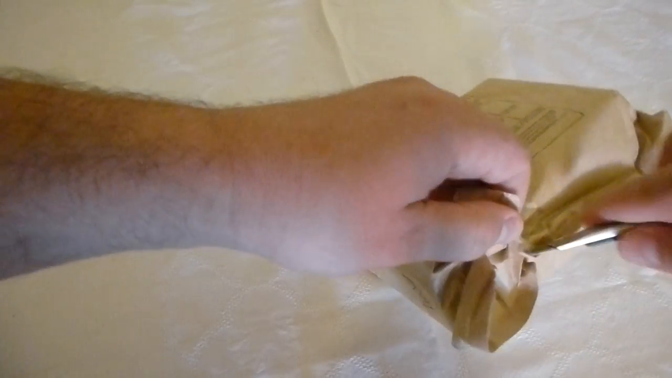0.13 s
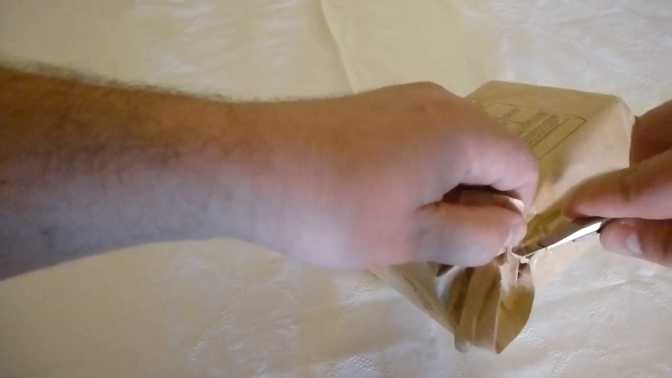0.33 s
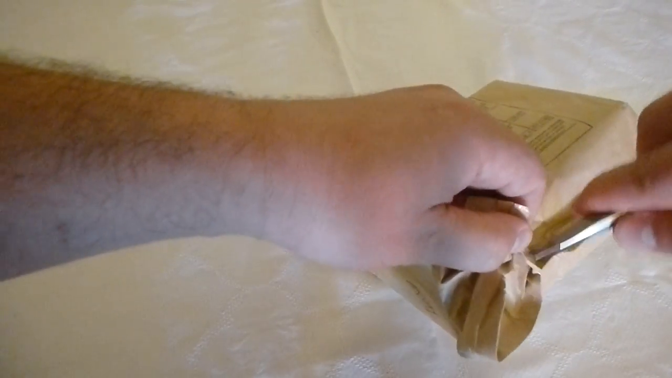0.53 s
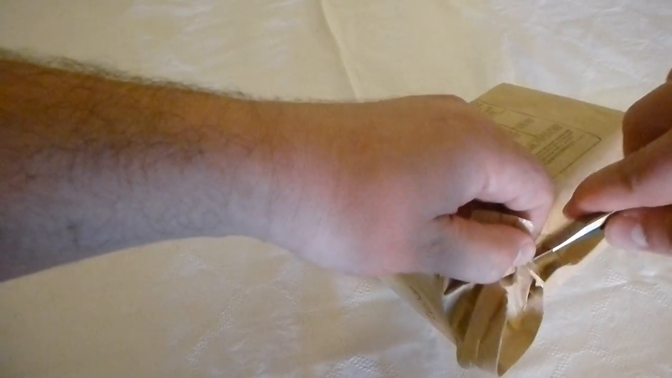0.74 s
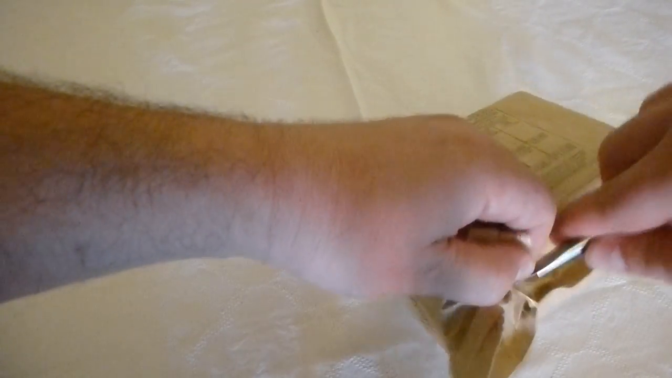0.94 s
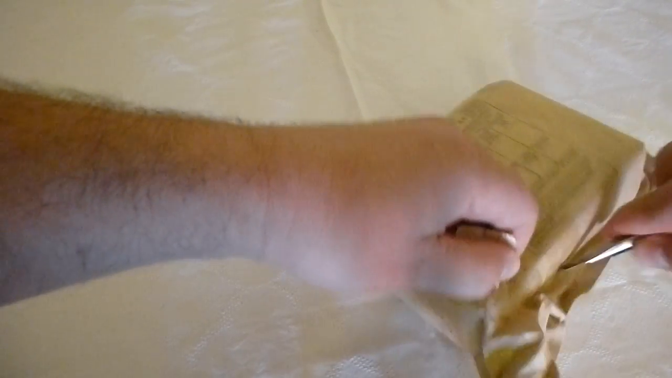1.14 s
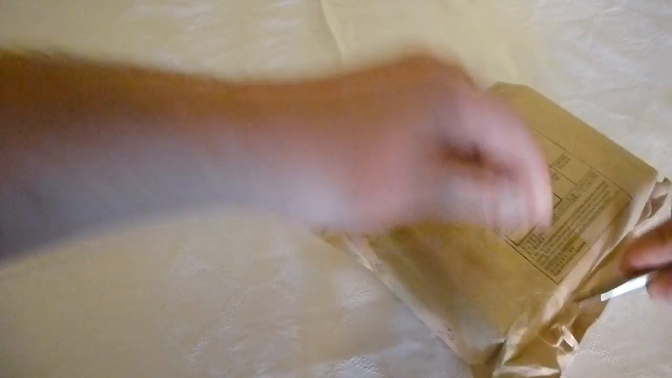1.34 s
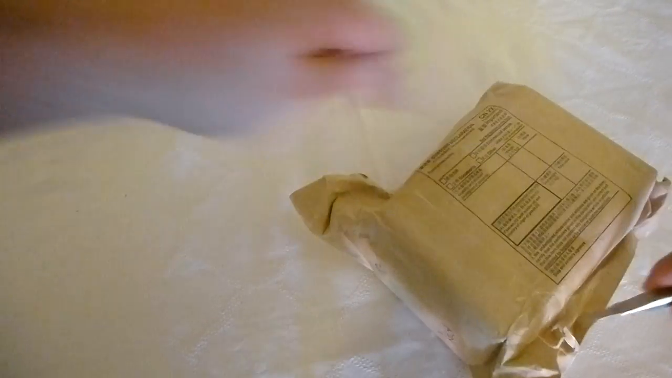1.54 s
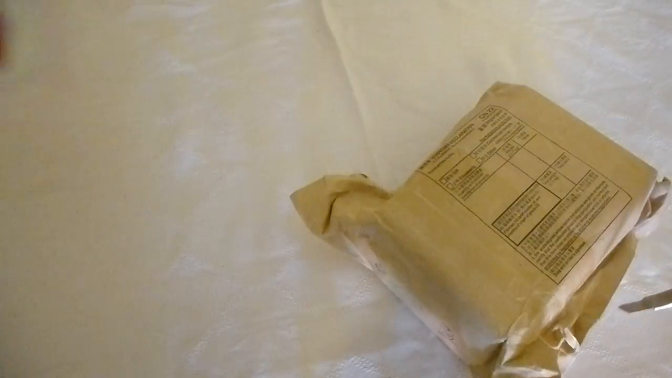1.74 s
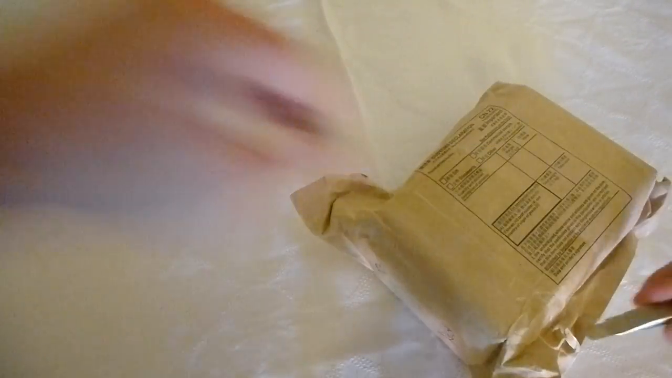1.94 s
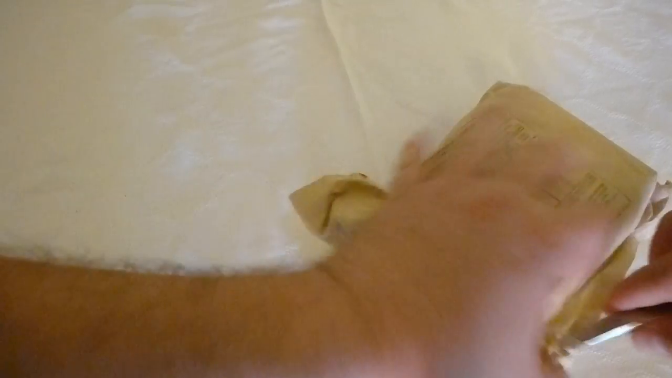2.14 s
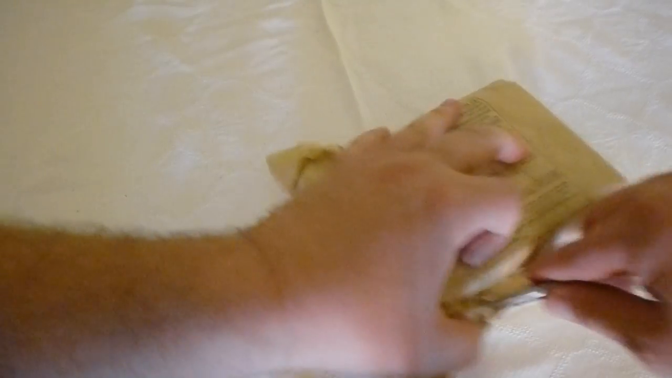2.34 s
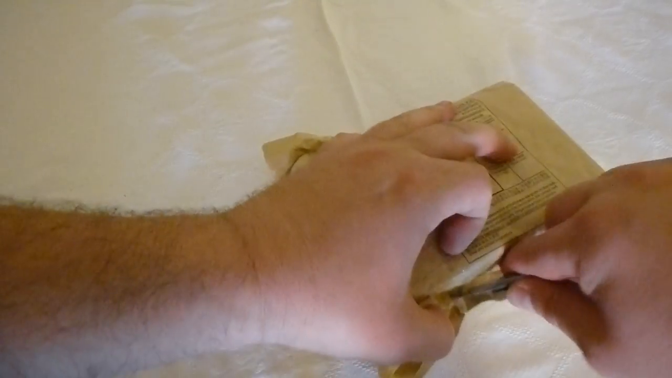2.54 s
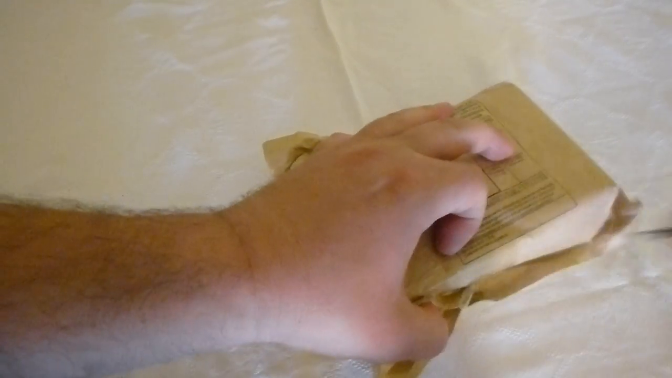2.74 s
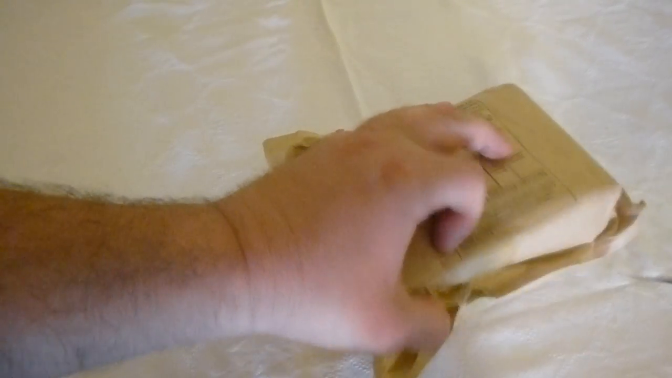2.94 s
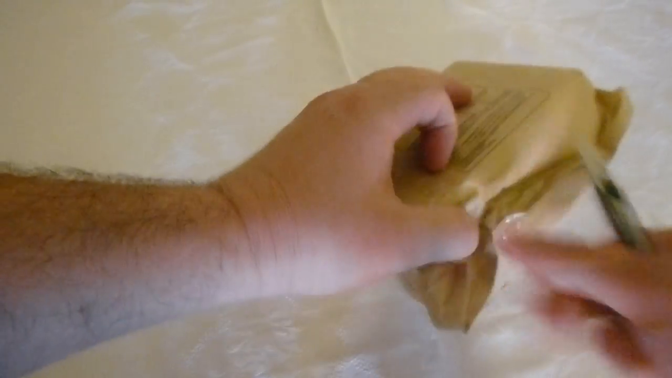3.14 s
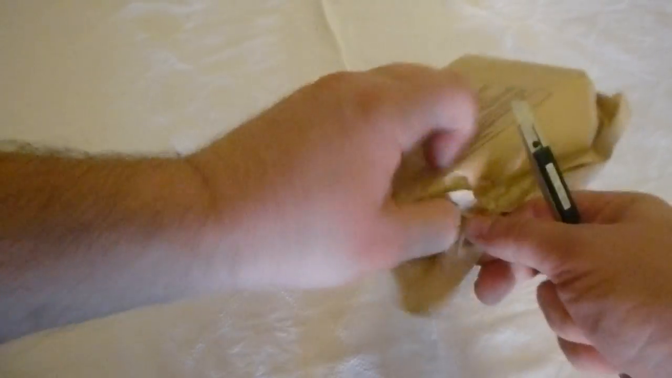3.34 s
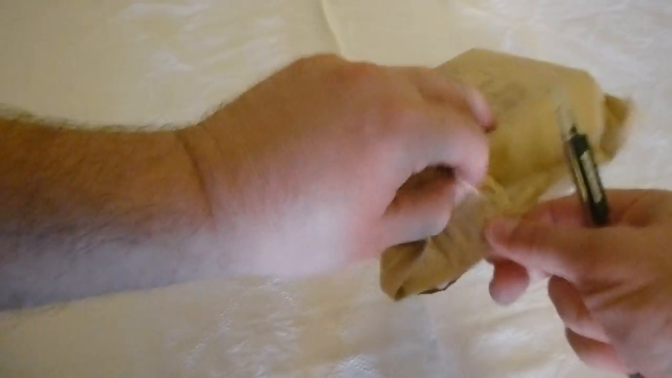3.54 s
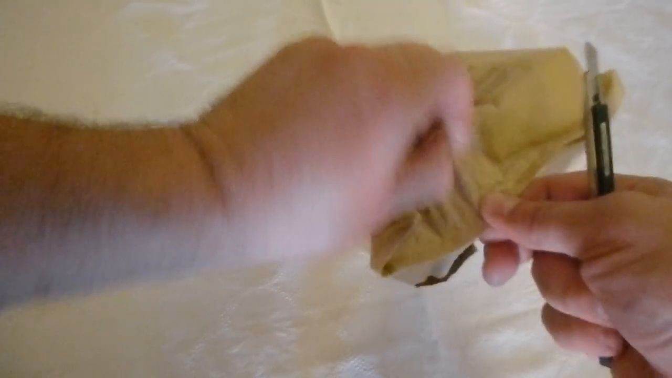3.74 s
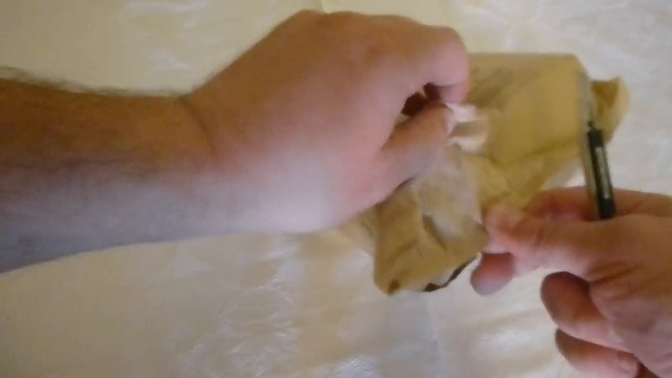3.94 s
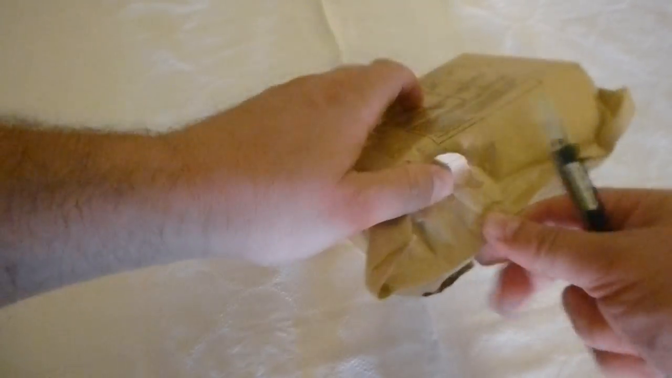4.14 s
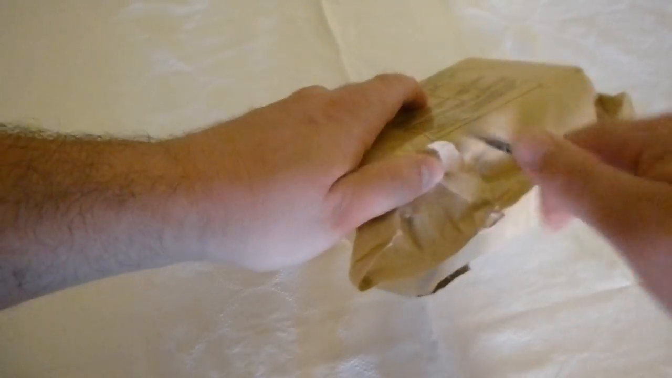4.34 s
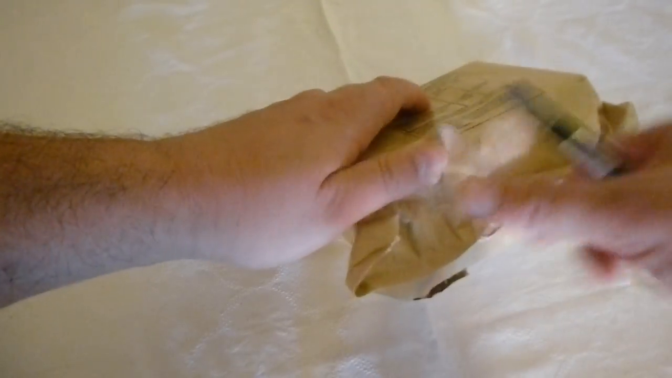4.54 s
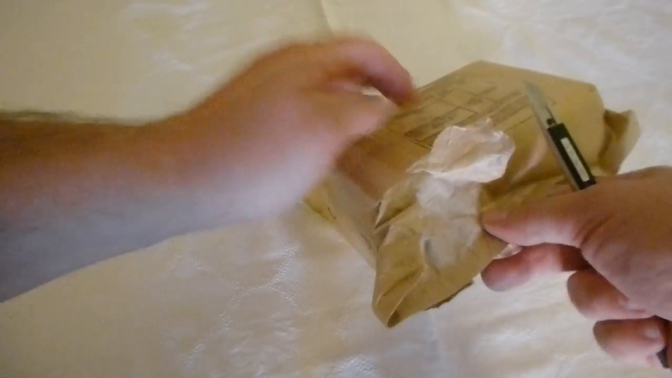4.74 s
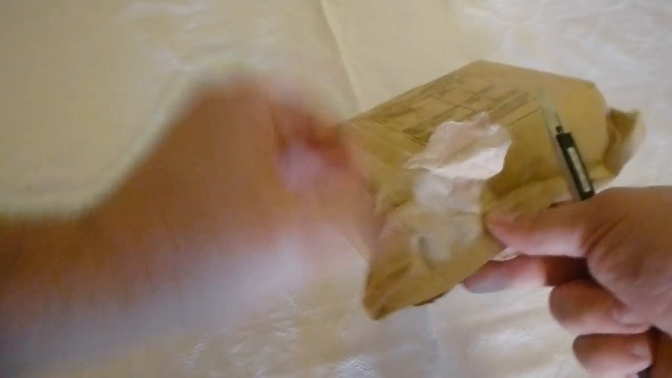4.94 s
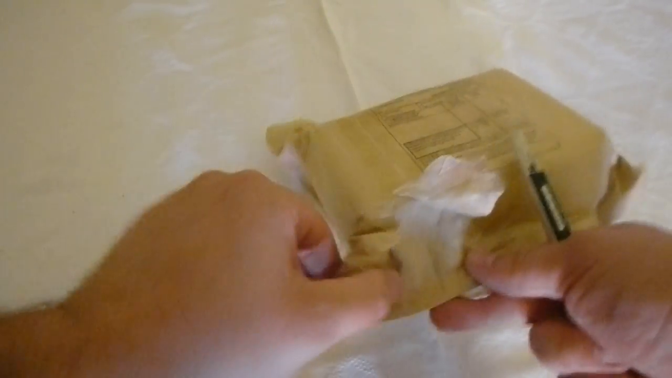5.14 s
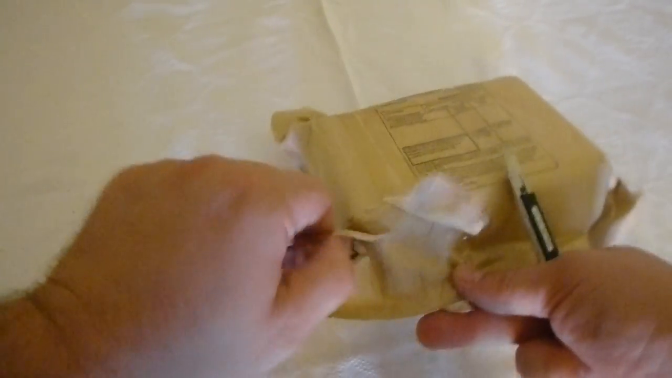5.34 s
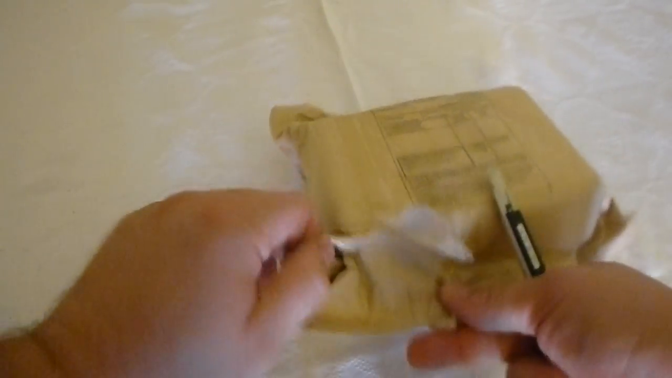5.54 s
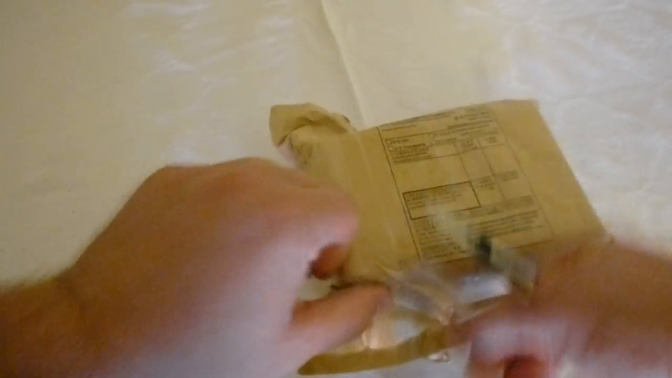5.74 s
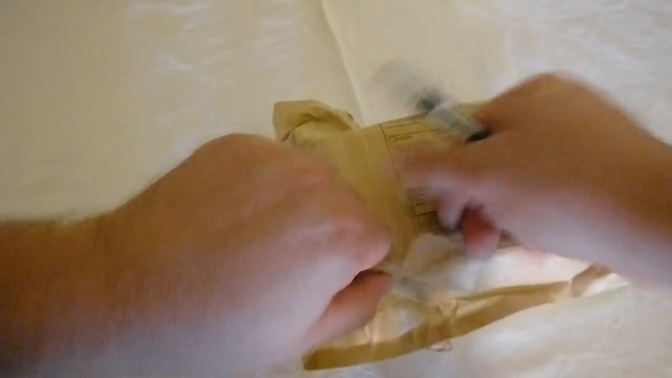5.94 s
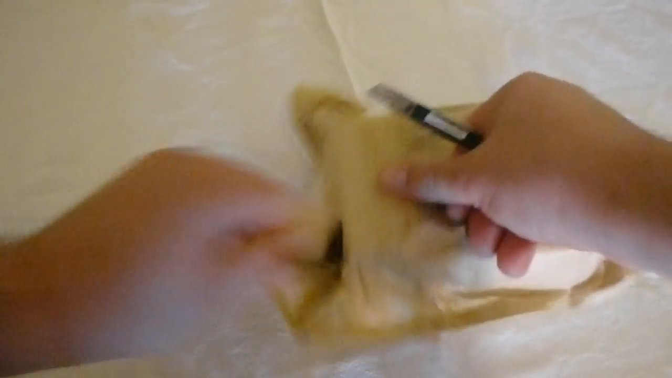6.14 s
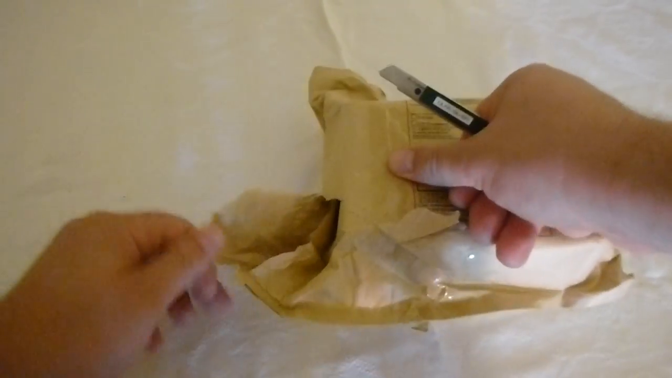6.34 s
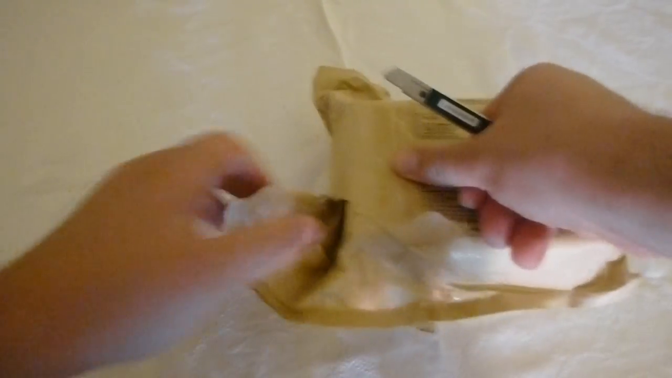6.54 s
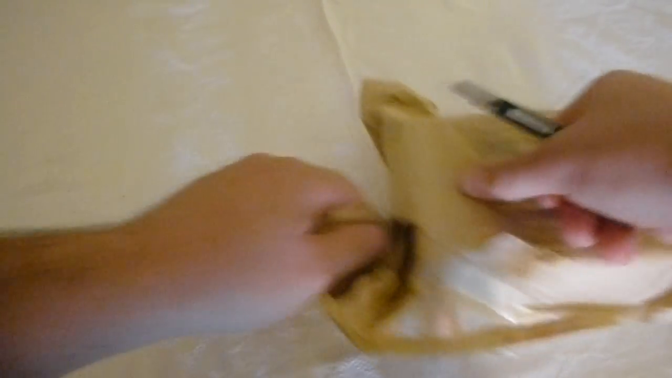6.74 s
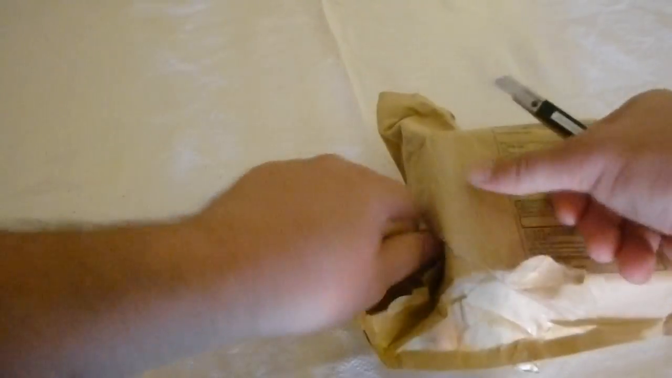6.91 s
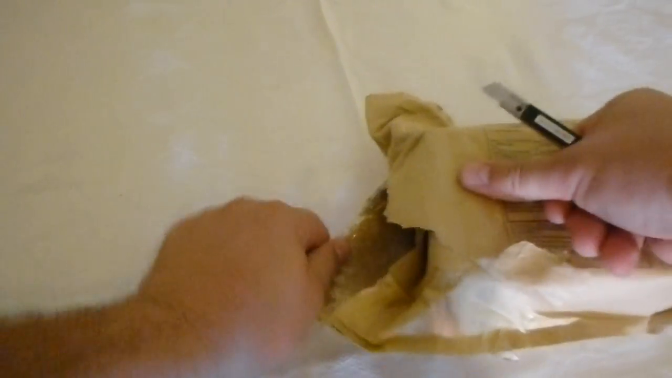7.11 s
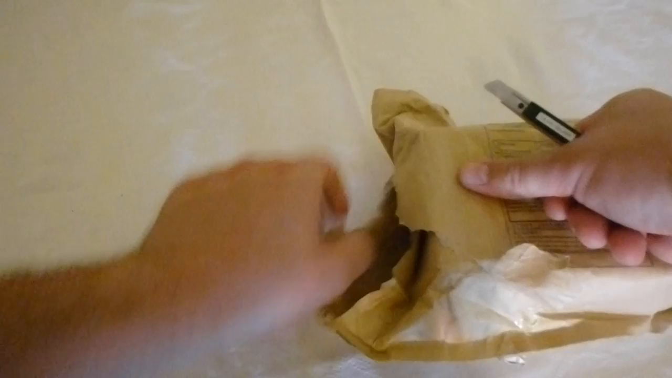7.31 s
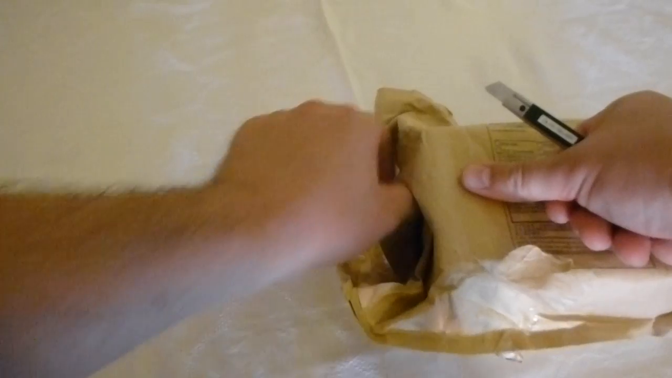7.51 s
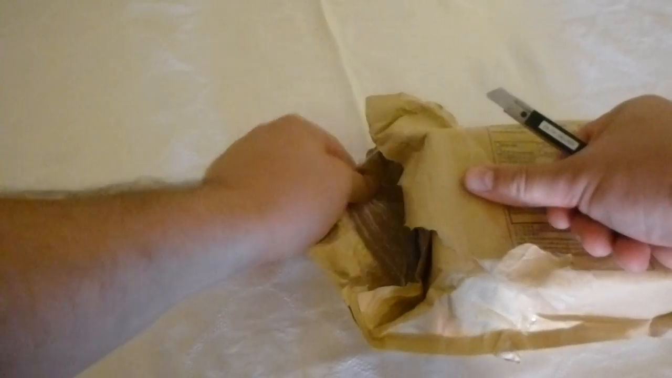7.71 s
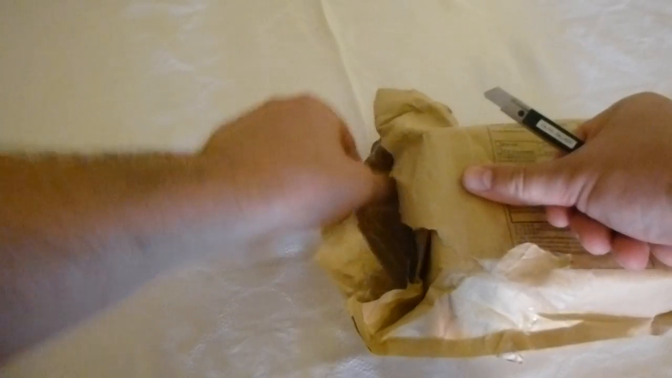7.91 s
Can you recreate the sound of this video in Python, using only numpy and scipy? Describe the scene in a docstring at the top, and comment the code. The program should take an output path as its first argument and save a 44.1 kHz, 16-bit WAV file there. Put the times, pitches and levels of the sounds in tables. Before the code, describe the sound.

Close up, hands pick at and rip open a crinkly paper parcel in short pulls, with sharp crease snaps and plastic ticks in a small room.

```python
"""Parcel ripped open by hand

Hands pick at a brown paper parcel on a cloth-covered surface and rip it open in short pulls, heard from close by.
Tears, rubs and pinches are showers of tiny fractures, each ringing a scrap of paper; scrapes are noise in one band.
Snapping creases and ticks of tape and a plastic pouch are noise bursts through resonances; bumps are low
decaying tones and thuds. Dense echoes of a small room answer, over steady noise."""
import sys
import numpy as np
from scipy import signal
from scipy.io import wavfile
from scipy.ndimage import map_coordinates

SR = 44100
rng = np.random.default_rng(int(sys.argv[2]) if len(sys.argv) > 2 else 0)


def file_out(sig):
    """Save sig as 16-bit WAV at sys.argv[1]."""
    # one column per channel
    cols = np.atleast_2d(sig).T
    # limit, then scale
    lim = np.clip(cols, -1, 1)
    pcm = np.round(lim * 32767).astype(np.int16)
    wavfile.write(sys.argv[1], SR, pcm)


N = 355887
TIME = np.arange(N) / SR


def amp(db):
    """Decibels to gain."""
    return 10 ** (np.asarray(db) / 20)


def unit(x):
    """Scales to rms 1."""
    return x / np.sqrt(np.mean(x ** 2) + 1e-20)


def read(points, hz):
    """Reads a curve on a log-frequency axis."""
    f, value = np.transpose(points)
    return np.interp(np.log(hz + 1), np.log(f + 1), value)


def add(mix, s, sound):
    """Mixes a sound in at time s."""
    part = mix[max(round(s * SR), 0):][:len(sound)]
    part += sound[:len(part)]


def colour(x, points, size=2048):
    """Causal minimum-phase filter with the given spectrum."""
    bins_hz = abs(np.fft.fftfreq(size, 1 / SR))
    log_gain = np.log(amp(np.maximum(read(points, bins_hz), -100)))
    taps = np.fft.ifft(np.exp(np.conj(signal.hilbert(log_gain)))).real
    return signal.oaconvolve(x, taps)[:len(x)]


def lowpass(x, hz):
    """Keeps what lies under hz."""
    return signal.sosfilt(signal.butter(2, min(hz, SR / 2 - 10), fs=SR, output="sos"), x)


def ring(x, hz, width_hz):
    """One resonance of gain 1."""
    hz = min(hz, 0.45 * SR)
    return signal.lfilter(*signal.iirpeak(hz, hz / min(width_hz, SR / 4), SR), x)


def moving_ring(x, hz, width_hz):
    """A resonance of gain 1 that follows the pitch curve hz."""
    turn = np.exp(2j * np.pi * np.cumsum(hz) / SR)
    r = np.exp(-np.pi * width_hz / SR)
    # shift the band down to 0 Hz, smooth, shift back
    return 2 * (turn * signal.lfilter([1 - r], [1, -r], x / turn)).real


def wander(knots_per_s):
    """Smooth random curve of rms 1 through knots_per_s random values a second."""
    knots = rng.standard_normal(N // 16)
    return unit(map_coordinates(knots, [TIME * knots_per_s], order=2, mode="wrap"))


def crackle(per_s, spread_db, clump_db, clump_rate, sharpness, steady_s, top_hz=15000, count=18):
    """Clumps of tiny fractures; each briefly rings a scrap of paper of its own pitch."""
    clumps = amp(clump_db * wander(clump_rate))
    sizes = amp(spread_db * np.minimum(rng.exponential(1, N), 3.5)) * rng.choice([-1, 1], N)
    clicks = sizes * clumps * (rng.random(N) < per_s / SR)
    scrap = rng.integers(0, count, N)
    out = 0.36 * lowpass(clicks, top_hz)
    for k, hz in enumerate(np.geomspace(700, top_hz, count)):
        out += ring(ring(clicks * (scrap == k), hz, hz / sharpness), hz, 2 * hz)
    # even out the power over steady_s: the hand, not the fracture sizes, sets the level
    power = signal.oaconvolve(out ** 2, signal.windows.hann(int(steady_s * SR)), "same")
    return unit(out / np.sqrt(abs(power) + 1e-3 * power.mean()))


def effort(moves, attack_s, attack_share, release_s, swell_db_per_s, dulling_db_per_s, size=2000):
    """Level and brightness curves/dB of hand movements, each an attack, a hold and a release."""
    t = np.linspace(0, N / SR, size)
    mids = treble = 1e-10
    for start, length, level_db, bright_db in moves:
        before = np.maximum(start - t, 0) / (attack_s + attack_share * length)
        after = np.maximum(t - start - length, 0) / release_s
        from_middle = np.clip(t - start, 0, length) - length / 2
        power = (amp(level_db + swell_db_per_s * from_middle) * np.exp(-before - after)) ** 2
        ratio = amp(bright_db - dulling_db_per_s * from_middle) ** 2
        mids = mids + power / (1 + ratio)
        treble = treble + power * ratio / (1 + ratio)
    return [np.interp(TIME, t, 10 * np.log10(p)) for p in (mids + treble, treble / mids)]


# hollow under the lifted paper: f/Hz, width/Hz, level/dB
HOLLOW_MODE = (3580, 690, -6.5)


def wrapping(x, move_rate, squeeze=0.17):
    """The hollow of the parcel rings; its pitch wanders as under squeezing."""
    hz, width_hz, db = HOLLOW_MODE
    return x + amp(db) * moving_ring(x, hz * np.exp(squeeze * wander(move_rate)), width_hz)


def play(x, level_db, bright_db, fizz_slope=0.99, even_db=5):
    """Sets level and balance of treble over mids; the brighter, the more fizz on top."""
    mids, below_fizz = (signal.sosfiltfilt(signal.butter(2, hz, fs=SR, output="sos"), x)
                        for hz in (2500, 8000))
    fizz = amp(fizz_slope * np.clip(bright_db - even_db, -10, 10))
    treble = below_fizz - mids + fizz * (x - below_fizz)
    treble = treble / np.std(x - mids) / np.sqrt(0.43 + 0.1 * fizz ** 2)
    bright = amp(bright_db)
    return amp(level_db) * (unit(mids) + bright * treble) / np.sqrt(1 + bright ** 2)


# background spectrum: f/Hz, relative level/dB per Hz
QUIET_SPECTRUM = [(15, -40), (25, -24), (59, -10.5), (250, -2), (488, -7.5), (856, -10), (15000, -21)]


def hush(level_db=-60):
    """Steady room noise and microphone hiss: coloured Gaussian noise."""
    return amp(level_db) * unit(colour(rng.standard_normal(N), QUIET_SPECTRUM))


# taut paper singing in one narrow band, mostly a blade or skin dragging over it; the 5.5 s row is a band
# lingering just after a rip: start t/s, length/s, level/dB, mid-drag f/Hz, width/Hz
SINGING_BANDS = [(.0, 0.21, -59, 2320, 280), (1.027, 0.071, -26.5, 5370, 2510), (4.88, 0.28, -56.5, 4160, 1200),
                 (5.198, 0.022, -33.5, 1600, 1470), (5.232, 0.27, -45.5, 3080, 1900),
                 (5.5, 0.095, -40.5, 1810, 990), (5.766, 0.028, -30, 1590, 1510), (6.131, 0.11, -25.5, 3080, 1810)]


def scrapes(waver=0.022, waver_rate=14, tighten=9, rough_db=3, slip_rate=260):
    """Taut paper sings in one band under rough drags; the harder the drag, the more its pitch climbs."""
    out = np.zeros(N)
    slips = rng.standard_normal(N) * amp(rough_db * wander(slip_rate))
    pressure = waver * wander(waver_rate)
    for start, length, level_db, hz, width_hz in SINGING_BANDS:
        along = np.clip((TIME - start) / length, 0, 1)
        pitch = hz * np.exp(pressure + tighten * amp(level_db) * (along - 0.5))
        band = moving_ring(moving_ring(slips, pitch, width_hz), pitch, width_hz)
        out += amp(level_db) * np.sqrt(abs(np.sin(np.pi * along))) * unit(band)
    return out


# skin sliding flat: start t/s, length/s, level/dB before gain_db, treble over mids/dB
SLIDE_STROKES = [(.03, 0.097, -55, 2.5), (1.738, 0.014, -49, 24), (2.28, 0.24, -44, 4.5),
                 (2.53, 0.12, -53, 3.5), (3.06, 0.16, -48.5, 1), (4.44, 0.13, -50.5, -1),
                 (4.87, 0.32, -57, 0), (5.208, 0.36, -43.5, 2.5), (6.41, 0.048, -45, -7),
                 (6.66, 0.69, -45.5, 4), (6.795, 0.061, -40, 2.5), (7.5, 0.16, -41, 2),
                 (7.92, 0.23, -47.5, 1.5)]
# fingers crumpling: start t/s, length/s, level/dB before gain_db, treble over mids/dB
PINCH_STROKES = [(.18, 0.12, -53, 0.5), (.625, 0.021, -53.5, -3), (.68, 0.22, -59.5, -1),
                 (.975, 0.15, -40.5, 6), (1.26, 0.32, -58, 2), (1.402, 0.0083, -42, 4),
                 (2.242, 0.023, -40, -5), (2.69, 0.18, -38, 5.5), (3.28, 0.11, -43.5, -5),
                 (3.4, 0.26, -41, 3), (3.61, 0.095, -34.5, 7.5), (3.71, 0.091, -40, 8),
                 (4.068, 0.018, -39.5, 8.5), (4.12, 0.28, -45, -0.5), (4.62, 0.043, -47, 2.5),
                 (4.725, 0.096, -39.5, -2.5), (5.105, 0.041, -49, 4), (5.715, 0.085, -37.5, 0),
                 (5.84, 0.17, -46.5, 5), (5.92, 0.031, -39.5, 3.5), (6.05, 0.089, -40, 2.5),
                 (7.35, 0.06, -46.5, 7)]
# stroke shape: eases in and out, swells and dulls slightly; units in the keys
STROKE_SHAPE = dict(attack_s=0.011, attack_share=0.042, release_s=0.021, swell_db_per_s=0.5, dulling_db_per_s=2)
# rubbed paper: f/Hz, relative level/dB per Hz
RUB_SPECTRUM = [(71, -33), (120, -12.5), (380, -8), (1050, -7), (1790, -7.5), (2070, -11.5), (4300, -10),
                (7000, -11), (16000, -14)]


def handling(slide_crinkle_db=-9, pinch_crinkle_db=0, gain_db=-2):
    """Sliding skin gives a fine hiss with little crinkle; a pinch breaks many small creases."""
    hiss = crackle(per_s=9000, spread_db=-0.5, clump_db=2.0, clump_rate=140, sharpness=2.8, steady_s=0.1)
    crinkle = crackle(per_s=520, spread_db=2.5, clump_db=3.5, clump_rate=67, sharpness=4.8, steady_s=0.13)
    out = np.zeros(N)
    for strokes, crinkle_db in ((SLIDE_STROKES, slide_crinkle_db), (PINCH_STROKES, pinch_crinkle_db)):
        level_db, bright_db = effort(strokes, **STROKE_SHAPE)
        sheet = wrapping(colour(hiss + amp(crinkle_db) * crinkle, RUB_SPECTRUM), move_rate=9.5)
        out += play(sheet, level_db + gain_db, bright_db)
    return out


# dry ticks of tape and plastic pouch: t/s, level/dB over 2 ms
FILM_TICKS = [(0.169, -56), (.236, -45), (.353, -43), (.494, -48), (.739, -45), (0.868, -45),
              (1.298, -39.5), (1.575, -40.5), (1.968, -52.5), (2.368, -35.5), (2.536, -41), (2.607, -32),
              (3.47, -28), (3.562, -35), (3.755, -29.5), (4.276, -37), (4.539, -39), (4.656, -35),
              (5.965, -29.5), (6.0, -34), (7.056, -31.5), (7.353, -27), (7.643, -32), (7.987, -32)]


def ticks(hz=6200, scatter=0.16, decay_s=0.0017, size=400):
    """A stiff film flicks over: one very short, bright click of slightly random pitch."""
    t, out = np.arange(size) / SR, np.zeros(N)
    for (s, db), chance in zip(FILM_TICKS, rng.standard_normal((len(FILM_TICKS), size))):
        pitch = hz * np.exp(scatter * np.clip(chance[-1], -2, 2))
        tick = ring(chance * np.exp(-t / decay_s), pitch, pitch)
        add(out, s, amp(db) * unit(tick) * np.sqrt(0.002 * SR / size))
    return out


# creases buckling, edges letting go: t/s, level/dB over 2 ms before gain_db, f/Hz
CREASES = [(0.284, -43, 1920), (0.635, -42.5, 1700), (0.676, -46, 1400), (0.934, -22, 5030),
           (0.954, -27, 1880), (1.094, -9, 1110), (1.103, -7, 1800), (1.365, -36, 2700), (1.401, -54, 2740),
           (1.506, -19.5, 5150), (2.181, -37.5, 1830), (2.217, -38, 1890), (2.239, -21.5, 3200),
           (2.266, -23, 890), (2.696, -21.5, 5370), (2.707, -20, 1290), (2.745, -20.5, 1060),
           (2.774, -3, 2740), (2.799, -12, 3670), (2.864, -16, 9000), (3.172, -22.5, 9900),
           (3.289, -27, 970), (3.359, -22.5, 2000), (3.387, -34, 2080), (3.429, -24, 1060),
           (3.448, -18.5, 5370), (3.458, -24, 5650), (3.569, -31, 1800), (3.609, -30, 4900),
           (3.656, -10, 4070), (3.676, -33, 4400), (3.832, -9, 4440), (3.873, -12, 1120),
           (4.095, -15.5, 9900), (4.122, -27, 1700), (4.194, -25, 940), (4.238, -25, 950), (4.3, -26, 1400),
           (4.337, -19, 1630), (4.396, -23.5, 1660), (4.515, -24.5, 920), (4.727, -22.5, 1020),
           (4.807, -29, 1040), (4.945, -33.5, 1030), (5.437, -20, 1140), (5.447, -24, 664),
           (5.518, -18.5, 1940), (5.53, -16, 2700), (5.72, -18, 1770), (5.747, -21, 895),
           (5.88, -26, 12000), (6.066, -27, 1260), (6.087, -26, 2830), (6.117, -9.5, 2250),
           (6.193, -9, 2800), (6.214, -14, 1600), (6.236, -7, 2800), (6.259, -14, 3000), (6.29, -6.5, 1760),
           (6.438, -26.5, 1640), (6.708, -38, 855), (6.833, -24.5, 2880), (6.848, -25, 1940),
           (6.985, -24, 1160), (7.008, -23.5, 1790), (7.064, -27, 1100), (7.089, -12, 2150),
           (7.147, -5.5, 1980), (7.179, -9.5, 1810), (7.351, -27, 1870), (7.461, -27, 1524),
           (7.509, -18, 3370), (7.621, -22.5, 890), (7.716, -22.5, 1880), (7.738, -17, 2800),
           (7.752, -7.5, 3900), (7.76, -13.5, 2530), (7.77, -9, 3060), (8.013, -21.5, 1700)]


def snaps(gain_db=-3.4, splinters=0.34, sharpness=1.33, crack=0.51, crack_s=0.0012,
          flap=0.37, cycles=17, stiff_hz=2200, size=2400):
    """A crease flips: a sharp crack and weaker splintering ring the panel beside it and the hollow behind."""
    t, out = np.arange(size) / SR, np.zeros(N)
    for (s, db, hz), chance in zip(CREASES, rng.standard_normal((len(CREASES), size))):
        stiff = hz ** 2 / (hz ** 2 + stiff_hz ** 2)  # small, stiff panels crack at once; slack ones flop slowly
        t60 = 0.04 + cycles / hz
        splintering = splinters * (1.4 - stiff) * np.exp(-np.log(1000) * t / t60)
        push = chance * (np.exp(-t / crack_s) + splintering) + 2 * (t == 0)
        panel = unit(ring(ring(push, hz, hz / sharpness), hz, 6 * stiff * hz))
        hollow = unit(ring(ring(push, 843, 450), 1320, 880))
        edge = unit(push) + unit(ring(push, 3650, 6700))
        snap = panel + flap * hollow + crack * stiff ** 0.56 * edge
        add(out, s, amp(db + gain_db) * unit(snap) * np.sqrt(0.002 * SR / size))
    return signal.sosfilt(signal.butter(2, 300, "high", fs=SR, output="sos"), out)


# tearing pulls: start t/s, length/s, level/dB before gain_db, treble over mids/dB, low body of the flap/dB
TEAR_PULLS = [(0.936, 0.028, -37.5, 3, -1.5), (1.052, 0.029, -19.5, 2, -1), (2.711, 0.021, -32, 6.5, 10),
              (2.774, 0.046, -25, 1.5, -8), (2.846, 0.016, -25, -0.5, 8), (3.838, 0.063, -27, 4.5, 6.5),
              (5.485, 0.05, -32.5, 4.5, -4), (6.166, 0.17, -27.5, 1.5, 8), (6.233, 0.066, -20.5, 2.5, -5),
              (7.123, 0.053, -16, -2.5, -5.5), (7.738, 0.063, -20.5, -2, -2)]
# pull shape: builds up, dulls fast as the flap grows, stops as the paper gives way; units in the keys
PULL_SHAPE = dict(attack_s=0.0059, attack_share=0.081, release_s=0.011, swell_db_per_s=-1, dulling_db_per_s=47)
# tearing paper: f/Hz, relative level/dB per Hz
TEAR_SPECTRUM = [(88, -59), (150, -21), (422, -13.5), (504, -23), (649, -10), (871, -7.5), (1450, -10),
                 (3040, -12), (4600, -9.5), (6140, -10.5), (14000, -9), (16000, -15)]


def rips(gain_db=-1, body_hz=480):
    """The tear breaks thousands of fibres a second in clumps; small flaps give less body."""
    pulls = np.array(TEAR_PULLS)
    level_db, bright_db = effort(pulls[:, :4], **PULL_SHAPE)
    body = amp(np.interp(TIME, pulls[:, 0] + pulls[:, 1] / 2, pulls[:, 4]))
    fibres = crackle(per_s=4000, spread_db=1.0, clump_db=3.0, clump_rate=180, sharpness=1.1, steady_s=0.027)
    sheet = wrapping(colour(fibres, TEAR_SPECTRUM), move_rate=16)
    lows = signal.sosfiltfilt(signal.butter(3, body_hz, fs=SR, output="sos"), sheet)
    return play(sheet + (body - 1) * lows, level_db + gain_db, bright_db)


# parcel bumping as hands shift or paper gives way: t/s, level/dB (before envelope), f/Hz, t60/s
PARCEL_BUMPS = [(1.103, -31.5, 310, 0.12), (1.11, -39.5, 117, 0.36), (1.449, -46.5, 580, 0.084),
                (2.24, -38.5, 250, 0.11), (2.774, -27, 288, 0.11), (2.788, -36.5, 119, 0.34),
                (4.138, -48, 115, 0.28), (4.251, -48, 114, 0.39), (4.334, -35, 190, 0.06),
                (4.37, -42, 109.5, 0.32), (5.437, -31.5, 390, 0.12), (5.749, -28, 330, 0.056),
                (6.18, -45, 99, 0.28), (6.291, -35, 248, 0.11), (7.171, -45, 113, 0.43),
                (7.798, -28.5, 115, 0.34)]


def bumps(swell_cycles=0.38, scuff=1.0, size=30000):
    """Soft low blows: short ones are noisy thuds, long ones boom as a standing wave of the room."""
    t, out = np.arange(size) / SR, np.zeros(N)
    for (s, db, hz, t60), chance in zip(PARCEL_BUMPS, rng.standard_normal((len(PARCEL_BUMPS), size))):
        thud = unit(ring(ring(chance, hz, hz), hz, hz))
        tone = min(t60 / 0.4, 1) ** 2
        body = tone * np.sin(2 * np.pi * hz * t) + scuff * (1.12 - tone) * thud
        envelope = (1 - np.exp(-t * hz / swell_cycles)) * np.exp(-np.log(1000) * t / t60)
        add(out, s, amp(db) * body * envelope)
    return signal.sosfilt(signal.butter(4, 85, "high", fs=SR, output="sos"), out)


# steady resonances of all paper sounds: f/Hz, width/Hz, level/dB
PAPER_MODES = [(868, 69, -10), (5040, 290, -8.5)]


def resonant(x):
    """Adds the steady resonances; paper radiates no deep bass."""
    x = x + sum(amp(db) * ring(x, hz, width_hz) for hz, width_hz, db in PAPER_MODES)
    return signal.sosfilt(signal.butter(2, 80, "high", fs=SR, output="sos"), x)


# room decay: f/Hz, t60/s
DECAY = [(1200, 0.5), (4000, 0.49), (16000, 0.39)]


def tail(first_s=0.0016, size=30000):
    """Dense reflections of a small room, the treble dying first."""
    taps = rng.standard_normal(size) * (rng.random(size) < 5000 / SR) * (np.arange(size) > first_s * SR)
    hz, t, z = signal.stft(taps, SR, nperseg=256)
    t60 = read(DECAY, hz)[:, None]
    echoes = signal.istft(z * np.exp(-np.log(1000) * t / t60) / np.sqrt(t60), SR)[1]
    return echoes / np.linalg.norm(echoes)


# room spectrum: f/Hz, level/dB against the sound sent in
ROOM_SPECTRUM = [(120, -9), (1200, -10), (16000, -13.5)]


def room(x, turn_rate=1.309, count=3):
    """Crossfades steadily among random tails, so the pattern of reflections keeps shifting."""
    sent = colour(x, ROOM_SPECTRUM) * np.sqrt(2 / count)
    out = 0
    for k in range(count):
        turn = np.cos(np.pi * (turn_rate * TIME + k / count))
        out = out + signal.oaconvolve(sent * turn, tail())[:N]
    return out


# diffuse sound's difference between the two microphones: f/Hz, gain/dB
SIDE_SPECTRUM = [(30, -5), (70, -1), (200, 4.5), (330, 10), (600, 3.5), (3000, -6), (14000, -8)]


def scene(snap_send=0.82, lead_samples=0.22):
    """Paper drifts from slightly right to nearly the centre; the room spreads around it."""
    paper = resonant(rips() + handling() + scrapes())
    clicks = resonant(snaps() + ticks())
    sent = paper + snap_send * clicks  # snaps on the near side of the parcel sound drier
    mid = paper + clicks + room(sent) + bumps() + hush()
    lead = lead_samples * np.gradient(paper + clicks)  # direct sound reaches the left microphone first
    side = colour(room(sent) + hush(), SIDE_SPECTRUM) + lead
    balance_db = np.interp(TIME, [1.5, 6.5], [-2.0, -0.3])  # left over right
    return np.array([(mid + side) * amp(balance_db / 2), (mid - side) * amp(-balance_db / 2)])


def record(dry, limit=0.9, edge_hz=16000):
    """Clips peaks at the limit, then cuts the band above edge_hz."""
    taps = signal.firwin(511, edge_hz, window=("kaiser", 9), fs=SR)
    return signal.oaconvolve(np.clip(dry, -limit, limit), taps[None], "same")


dry = scene()
out = record(dry)
file_out(out)
```